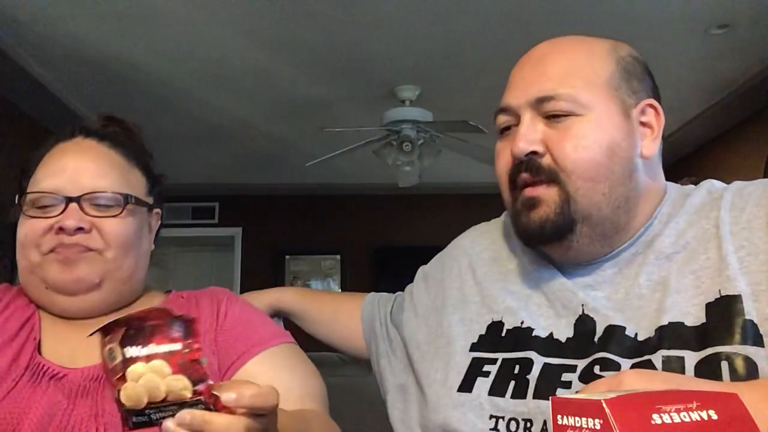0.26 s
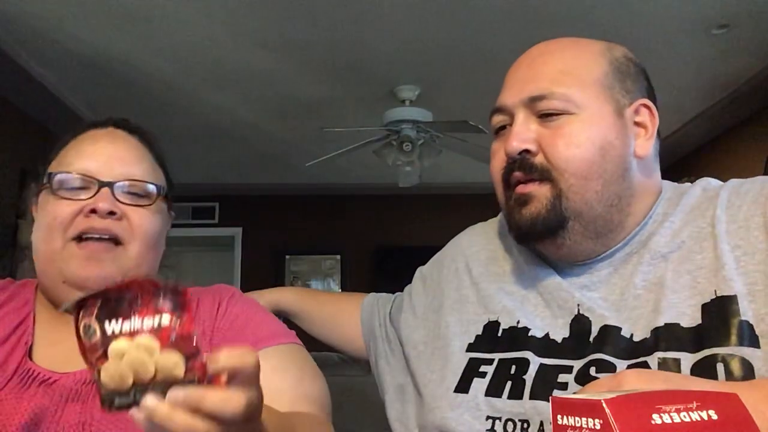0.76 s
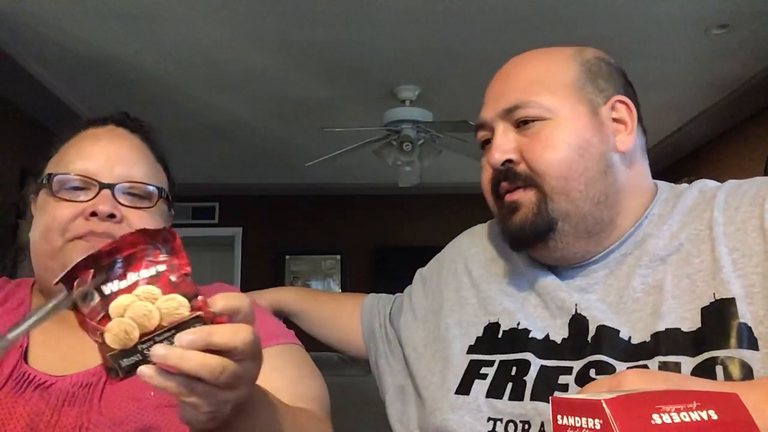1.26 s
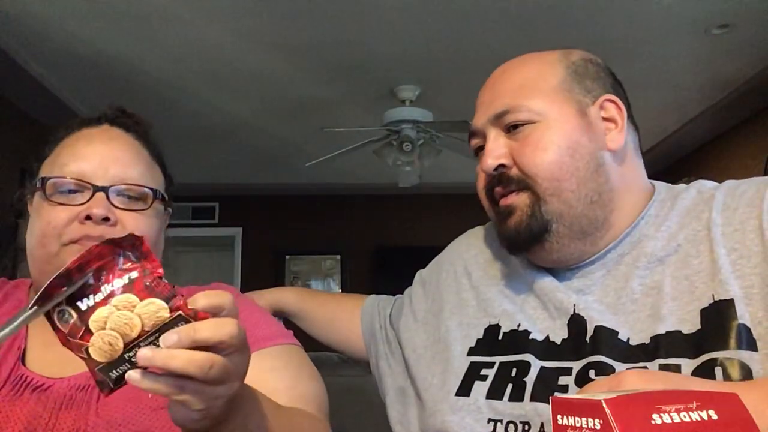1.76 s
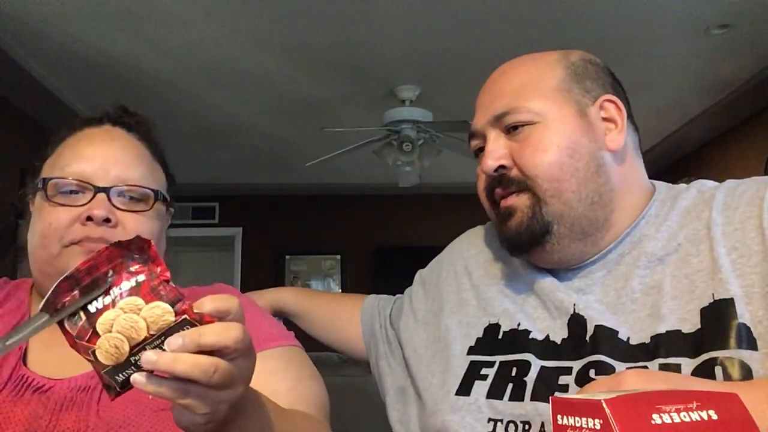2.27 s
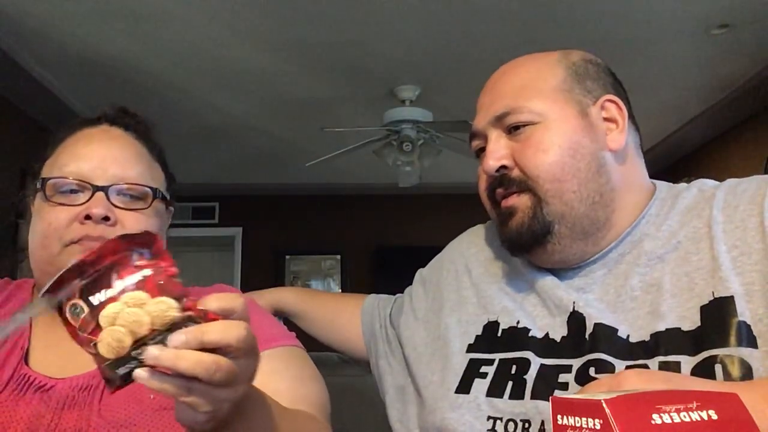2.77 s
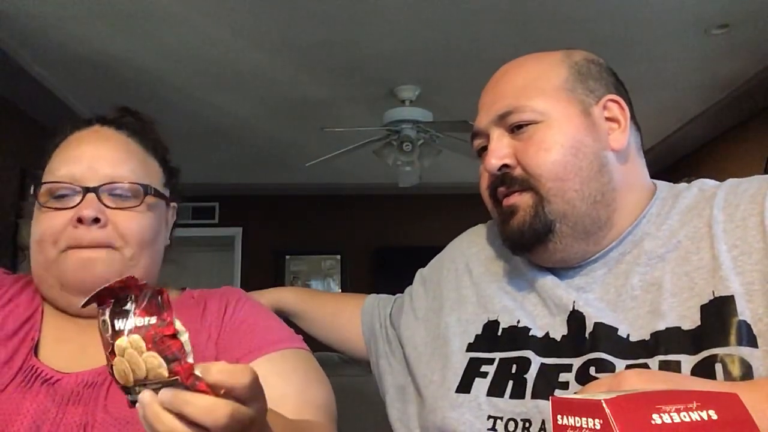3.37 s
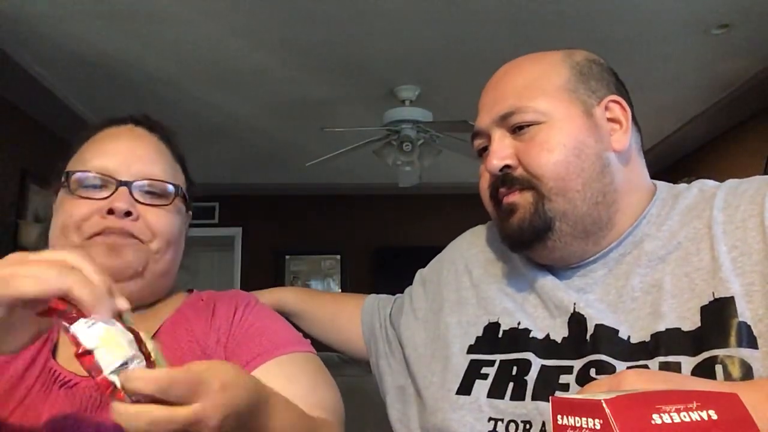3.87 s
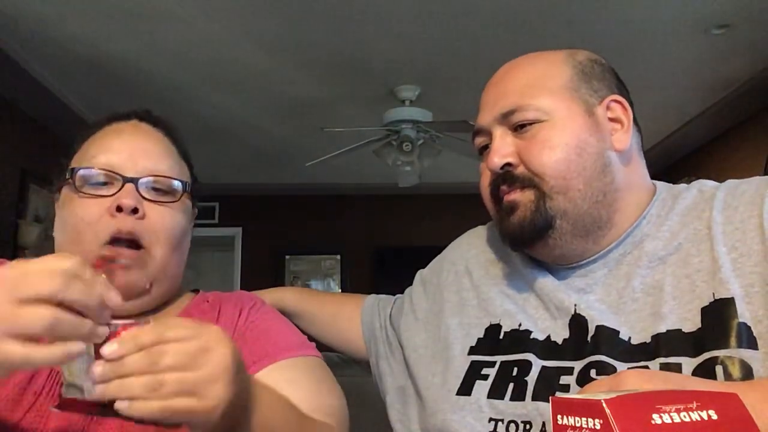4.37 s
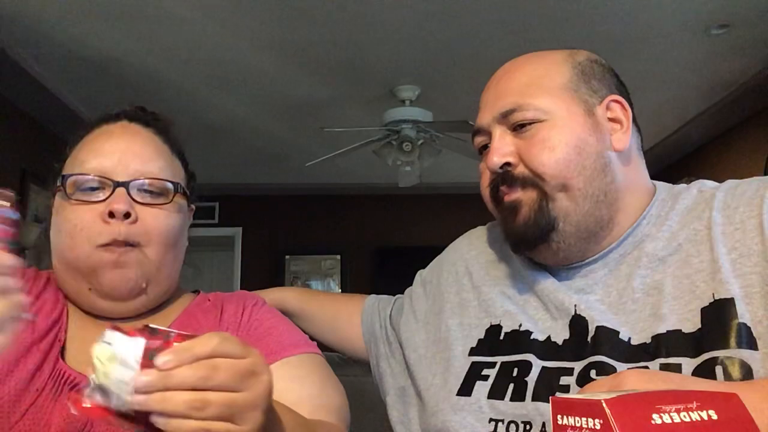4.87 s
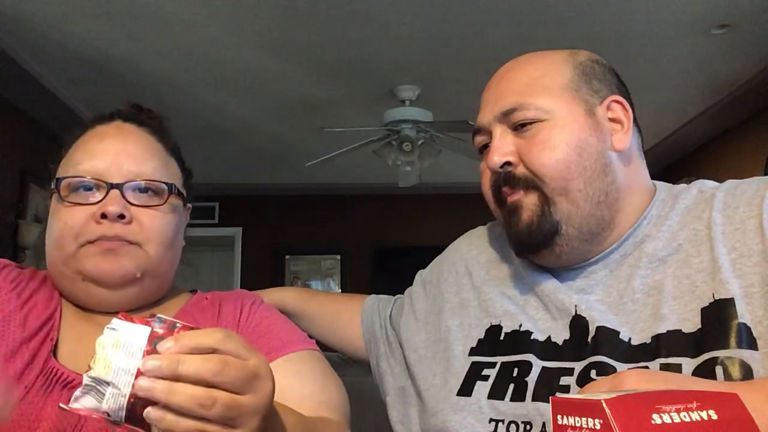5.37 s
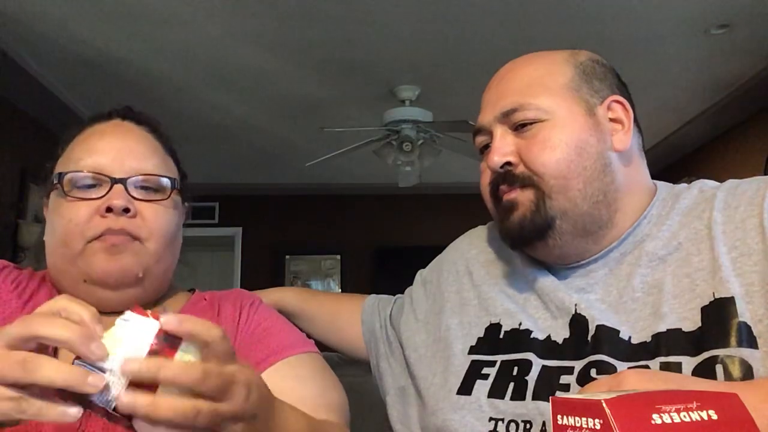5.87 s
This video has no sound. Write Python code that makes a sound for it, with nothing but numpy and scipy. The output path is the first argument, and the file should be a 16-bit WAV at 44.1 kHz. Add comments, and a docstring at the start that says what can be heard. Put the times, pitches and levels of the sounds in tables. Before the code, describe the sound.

Crisp thin foil crinkling, light at first, then a hard clatter on a table and denser tearing crackle, fading to small rustles indoors.

```python
"""A small foil snack bag is turned, cut and torn by hand in a quiet living room, an arm's length from the microphone.
Creases snap as short noise bursts ringing one facet, with foil fizz and a puff of the bag's air, over a crackle
of tiny random snaps. Biscuits bump inside as low resonant scuffs; scissors laid on a wooden table are decaying modes.
Early reflections, a sparse decaying tail and patchy household noise make the room."""
import sys
import numpy as np
from scipy import signal
from scipy.fft import rfft, irfft
from scipy.io import wavfile
from scipy.ndimage import uniform_filter1d

SR = 44100
rng = np.random.default_rng(int(sys.argv[2]) if len(sys.argv) > 2 else 0)


def put_to_file(sound):
    """Save the sound as 16-bit audio at rate SR, in the file named by the first command-line argument."""
    columns = np.atleast_2d(sound).T  # one column per channel
    safe = np.clip(columns, -1, 1)
    whole_steps = np.round(safe * 32767)
    wavfile.write(sys.argv[1], SR, whole_steps.astype(np.int16))


N = 270333

# Treble colour of the foil. Each row: frequency in Hz, relative level in dB.
FOIL_COLOUR = [(3000, -21.5), (5000, 15), (7000, 13), (9500, 10.5), (12500, 6), (14500, -8), (16000, -14)]
# Colour of the whole film sounding. Each row: frequency in Hz, relative level in dB.
FILM_COLOUR = [(120, -23.5), (400, -2), (900, 1.5), (1500, 0), (2600, -0.5), (4000, -4), (6000, -12),
               (10000, -26.5)]


def gain_of(db):
    """Amplitude factor of a level in dB."""
    return 10 ** (np.asarray(db) / 20)


def evened(x):
    """Scale to an RMS of 1."""
    return x / np.sqrt(np.mean(x ** 2) + 1e-20)


def peaked(x):
    """Scale to a peak of 1."""
    return x / (abs(x).max() + 1e-20)


def read(points, hz):
    """Read a curve of (Hz, value) points, interpolated over log frequency."""
    f, value = np.transpose(points)
    return np.interp(np.log(hz + 1), np.log(f + 1), value)


def add(mix, s, sound):
    """Lay a sound into the mix at s seconds, cut at the end."""
    part = mix[round(s * SR):][:len(sound)]
    part += sound[:len(part)]


def coloured(x, spectrum):
    """Causal filter with the given spectrum: the phase follows from the log gain."""
    hz = abs(np.fft.fftfreq(2048, 1 / SR))
    log_gain = np.log(gain_of(read(spectrum, hz)))
    taps = np.fft.ifft(np.exp(np.conj(signal.hilbert(log_gain)))).real[:1024]
    return signal.oaconvolve(x, taps)[:len(x)]


def resonate(x, hz, width_hz):
    """One resonance of gain near 1: a single complex pole."""
    pole = np.exp((2j * hz - width_hz) * np.pi / SR)
    return 2 * signal.lfilter([1 - abs(pole)], [1, -pole], x).real


def resonate_twice(x, hz, width_hz):
    """The same resonance passed twice, for steeper sides."""
    return resonate(resonate(x, hz, width_hz), hz, width_hz)


def room_tone():
    """Low household rumble and hiss: shaped noise whose level is slightly patchy in time and frequency."""
    # Spectrum of the quiet room. Each row: frequency in Hz, relative density in dB per Hz.
    air_spectrum = [(18, -31), (30, -9), (71, 12), (280, 6.5), (937, -35.5), (1960, -10), (2350, -16),
                    (5310, -13), (12000, -52), (14800, -39), (16000, -51)]
    level_db = -68  # RMS
    frames, hz = N // 256 + 5, np.fft.rfftfreq(1024, 1 / SR)
    a, b, patches = rng.standard_normal((frames, 513, 3)).T
    patches = uniform_filter1d(patches, 10, 0)  # over frequency
    patches = evened(uniform_filter1d(patches, 12, 1))  # over time
    patch_db = 2 * patches
    z = (a + 1j * b) * gain_of(read(air_spectrum, hz)[:, None] + patch_db)
    noise = signal.istft(z, nperseg=1024, noverlap=768)[1][:N]
    return gain_of(level_db) * evened(noise)


def room(x):
    """Sparse taps of random sign, each band dying at its own speed; three tails take turns."""
    # Decay of the living room. Each row: frequency in Hz, t60 in s.
    decay = [(125, 0.64), (300, 0.36), (800, 0.17), (2000, 0.26), (5000, 0.27), (12000, 0.3)]
    out = np.zeros(N)
    turn = 2 * np.pi * 3.1 * np.arange(N) / SR  # 3.1 Hz
    for k in range(3):
        taps = np.zeros(SR // 2)
        at = np.arange(330, len(taps) - 20, 20)
        taps[at + rng.integers(0, 20, len(at))] = rng.choice([-1., 1.], len(at))
        hz, t, z = signal.stft(taps, SR, nperseg=256)
        fade_db = -60 * t / read(decay, hz)[:, None]
        tail = signal.istft(z * gain_of(fade_db), SR, nperseg=256)[1]
        share = np.sqrt(2 / 3) * np.cos(turn + k * np.pi / 3)  # the three powers sum to 1
        out += signal.fftconvolve(x * share, tail / np.linalg.norm(tail))[:N]
    return out


def echoes(x):
    """The first few reflections, each a single delayed copy."""
    # Off table, ceiling and walls. Each row: delay in s, level in dB.
    reflections = [(.0045, -41.5), (.0085, -22.5), (0.012, -19.5), (0.017, -21.5), (.021, -47.5)]
    return sum(gain_of(db) * np.pad(x, (round(s * SR), 0))[:N] for s, db in reflections)


def knocks():
    """Each blow rings the table top and rattles on for a moment; steel adds a clack from the upper modes."""
    # Blows on the table. Each row: start in s, peak of the wood in dB, peak of the steel clack in dB re wood,
    # freedom of the top to ring from 0 to 1.
    blows = [(0.153, -31, -8, 0.55), (2.749, -44, 6.5, 0.5), (3.241, -31, 1.5, 0.53),
             (3.343, -32.5, 0, 0.23), (3.378, -23, -3.5, 0.77), (3.481, -20.5, -9.5, 0.84),
             (3.507, -21.5, -7.5, 0.48)]
    # Modes, six of wood then three of clack. Each row: frequency in Hz, relative level in dB,
    # t60 in s when fully free.
    modes = [(71.6, -19, 0.79), (132.8, 3, 0.21), (279.6, 0.5, 0.37), (360, -12, 0.23), (525, -5, 0.048),
             (630, -32, 0.069), (1126, 4.5, 0.16), (1312, 7.5, 0.083), (2570, 5, 0.015)]
    out, t = np.zeros(N), np.arange(SR // 2) / SR
    for (s, db, clack_db, free), noise in zip(blows, rng.standard_normal((len(blows), 3000))):
        freedom = np.clip(free, .2, 1)
        ring = [gain_of(mode_db - 60 * t / (t60 * freedom)) * np.sin(2 * np.pi * hz * t)
                for hz, mode_db, t60 in modes]
        rattle = 0.0077 * noise * np.exp(-t[:len(noise)] / 0.0065)
        rattle[0] += 1  # the blow itself
        wood = sum(ring[:6]) * (1 - np.exp(-t / 0.0019))  # the bass swells slowly
        wood = peaked(signal.oaconvolve(wood, rattle))
        steel = peaked(signal.oaconvolve(sum(ring[6:]), rattle))
        add(out, s, gain_of(db) * (wood + gain_of(clack_db) * steel))
    return out


def bumps():
    """Dull soft blows: a rough scuff that dies away, heard around one low pitch."""
    # Biscuits bump inside the bag. Each row: start in s, peak in dB, pitch in Hz, t60 of the scuff in s.
    biscuits = [(1.159, -42, 240, 0.062), (1.731, -45.5, 550, 0.053), (2.316, -41.5, 390, 0.097),
                (2.425, -36, 525, 0.02), (2.634, -36.5, 378, 0.069), (2.741, -39, 382, 0.14),
                (4.788, -32, 303, 0.036), (5.204, -42, 620, 0.13), (5.221, -44.5, 480, 0.077),
                (5.262, -48, 620, 0.34), (5.701, -45.5, 368.4, 0.032)]
    out, t = np.zeros(N), np.arange(6000) / SR
    for (s, db, hz, t60), noise in zip(biscuits, rng.standard_normal((len(biscuits), len(t)))):
        push = 1.54 * np.exp(-t / 0.0001) + noise * gain_of(-60 * t / max(t60, .01))
        thud = resonate(resonate(push, hz, 0.14 * hz), hz, 0.95 * hz)
        add(out, s, gain_of(db) * peaked(thud))
    return out


def bag_air(x):
    """The hollow low voice of the bag: resonances of its air and panels."""
    # Each row: frequency in Hz, width of each of two passes in Hz, level in dB.
    hollows = [(279.5, 300, 5), (360.5, 253, 7.5), (527, 383, 5.5)]
    return sum(gain_of(db) * resonate_twice(x, hz, width) for hz, width, db in hollows)


def handling():
    """Levels of film, fizz and rub in dB: each squeeze grips, holds and lets go; powers add over the rest level."""
    # The fingers work the bag. Each row: start in s, hold in s, film level in dB, foil fizz in dB re film,
    # low rub in dB re film.
    squeezes = [(0.0, 0.01, -55.5, -3, -3), (0.187, 0.12, -58, -7.5, -2), (0.49, 0.31, -67, -3.5, -3),
                (1.151, 0.0083, -52, -8, -4), (1.22, 0.3, -68.5, -2.5, -1), (1.7, 0.035, -61, -2, 0.5),
                (2.1, 0.068, -63, -6, -0.5), (2.21, 0.14, -57.5, -3, -7), (2.383, 0.036, -57, 2.5, -0.5),
                (2.633, 0.12, -51.5, -3.5, -4), (3.09, 0.16, -70, -0.5, -9),
                (3.225, 0.069, -58.5, -9.5, -1), (3.38, 0.027, -46.5, -18, 6), (3.481, 0.057, -49.5, -7, 4),
                (3.773, 0.058, -52.5, -3.5, -2.5), (3.905, 0.013, -49.5, -0.5, -3.5),
                (4.144, 0.11, -59.5, 5.5, -0.5), (4.41, 0.079, -57.5, -2, -12.5),
                (4.653, 0.14, -47.5, -4.5, -9.5), (4.965, 0.02, -65, -3.5, -10),
                (5.222, 0.037, -59.5, -1, -1), (5.523, 0.02, -65.5, -7, 1), (5.642, 0.28, -60, -10.5, -10),
                (6.08, 0.092, -68, -13, -18)]
    # Film, fizz and rub at rest, in dB.
    rest_db = (-76.5, -81, -75)
    grip_db_per_s, let_go_db_per_s = 514, 179
    t = np.arange(0, N / SR + .01, .002)
    power = gain_of(rest_db)[:, None] ** 2
    for s, hold, db, fizz_db, rub_db in squeezes:
        rise_db = grip_db_per_s * (t - s)
        fall_db = let_go_db_per_s * (s + hold - t)
        shape_db = np.minimum(0, np.minimum(rise_db, fall_db))
        power = power + gain_of(db + shape_db + np.array([[0], [fizz_db], [rub_db]])) ** 2
    return [np.interp(np.arange(N) / SR, t, 10 * np.log10(row)) for row in power]


def ticks(film_db):
    """Stray little creases at random moments, each ringing one facet for a millisecond or so; they follow the film."""
    # Pitches of the facets, in Hz.
    facet_hz = (1770, 2700, 4160, 6500, 9500)
    per_s, least_db, spread_db = 49, 6, 3.1  # the softest tick peaks 6 dB above the film level
    tick_db = film_db + least_db + spread_db * np.minimum(rng.exponential(1, N), 3)
    size = gain_of(tick_db) * (rng.random(N) < per_s / SR)
    facet = rng.integers(0, len(facet_hz), N)
    noise = rng.standard_normal((len(facet_hz), 300))
    burst = noise * np.exp(-np.arange(noise.shape[1]) / (0.0017 * SR))
    out = np.zeros(N)
    for k, hz in enumerate(facet_hz):
        tick = peaked(resonate_twice(burst[k], hz, 0.51 * hz))
        out += signal.oaconvolve(size * (facet == k), tick)[:N]
    return out


def grains(per_s, spread_db, rub):
    """Random tiny snaps, a few of them large, each smeared over some milliseconds, on a smooth rub."""
    size = gain_of(spread_db * np.minimum(rng.exponential(1, N), 3.6)) * (rng.random(N) < per_s / SR)
    smeared = signal.lfilter([1], [1, -np.exp(-1 / (0.0065 * SR))], size)
    return (rub + smeared) * rng.standard_normal(N)


def crackle():
    """Fine creasing under the fingers: film and foil crackle apart, the air of the bag follows the film.
    Light handling is a smooth rub, firm handling breaks up into grains."""
    film_db, fizz_db, rub_db = handling()
    firm = np.clip((np.maximum(film_db, fizz_db) + 73.5) / 16, 0, 1)
    film_grains = evened(grains(per_s=220, spread_db=6.5, rub=0.96))
    film = firm * film_grains + (1 - firm) * rng.standard_normal(N)
    foil_grains = evened(grains(per_s=260, spread_db=4.5, rub=0.3))
    foil = firm * foil_grains + (1 - firm) * rng.standard_normal(N)
    film_sound = gain_of(film_db) * evened(coloured(film, FILM_COLOUR))
    low_rub = gain_of(rub_db) * evened(bag_air(film))
    fizz = gain_of(fizz_db) * evened(coloured(foil + 0.55 * film, FOIL_COLOUR))
    return film_sound + low_rub + fizz + ticks(film_db)


def snaps():
    """A crease flips in a millisecond or two: its facet rings briefly, the foil fizzes, the bag puffs.
    Gives what reaches the microphone directly and what is thrown toward the walls."""
    # Creases that snap. Each row: start in s, peak of the facet and film in dB, pitch of the facet in Hz,
    # treble fizz in dB re that peak, puff of the bag in dB re that peak.
    creases = [(0.102,-46.5,1570,-13,-4),(.116,-36.5,3370,-20,-30),(0.155,-22.5,1400,-10,-0.5),(.162,-30.5,1470,2,-18),(0.224,-29.5,3450,4,-22),(0.266,-43,2700,-13,-15),(.314,-48,1420,-15,-6),(.415,-33,3210,4,-21),(.474,-36,2720,-4,-34),(.53,-26.5,2600,1.5,-25),(0.637,-44,5060,-30,-28),(0.719,-55,1600,5,-20),(1.074,-54,3800,5.5,-27),(1.11,-37,5070,-13,-29),(1.154,-18.5,5000,-7,-18),(1.16,-28,1040,4.5,0),(1.465,-41,4590,-6,-31),(1.481,-24.5,4600,-21,-21),(1.609,-35.5,2310,-2,-32),(1.698,-22.5,2230,0.5,-28),(1.741,-38,1940,-12,-8),(1.891,-46,1735,-35,-1),(1.972,-55,2000,3,-25),
               (2.075,-50.5,4930,7,-13),(2.089,-32,2220,-41,-19),(2.113,-39.5,1053,-19,-27),(2.127,-29,4400,-9,-19),(2.161,-16,4770,-6,-40),(2.211,-23.5,2100,-1,-13),(2.228,-25.5,6460,-2,-35),(2.251,-19,7500,-25,-26),(2.27,-18.5,5940,-42,-24),(2.312,-39,6380,9,-40),(2.346,-24.5,5640,-7,-17),(2.424,-33.5,740,3,-4.5),(2.431,-21.5,4570,-8.5,-11.5),(2.506,-29.5,1590,1,-47),(2.567,-24.5,5530,-3,-23),(2.601,-28.5,4800,-32,-10),(2.634,-34.5,1250,4,-22),(2.68,-33,5400,7,-6),(2.709,-29.5,5870,3,-11),(2.733,-23.5,8850,-31,-10),(2.76,-23.5,6400,-35,-45),
               (3.074,-55,2810,-2,-10),(3.202,-46,2654,-7,-24),(3.38,-14,1530,-38,-0.5),(3.466,-35,1418,-13,-15),(3.483,-10.5,2250,-52,-9.5),(3.527,-29,2380,-33,1.5),(3.585,-49,2190,12.5,-6),(3.731,-44,3810,-3,-22),(3.772,-40,1005,0,-3),(3.778,-41.5,1974,-1,0),(3.808,-23,5100,-12,-48),(3.833,-28.5,3020,-22,-37),(3.902,-32,1970,-17,-29),(3.916,-20,1710,-4,-20),(3.942,-40,2850,-16,-21),(3.994,-33.5,6360,-21,-29),
               (4.02,-29.5,1540,-0.5,-14),(4.052,-24,1576,-31,-36),(4.092,-31.5,2520,-3,-18),(4.144,-28,2900,5.5,-42),(4.148,-20,2490,-5,-31),(4.186,-25,2900,-2,-24),(4.193,-15.5,2570,-6,-50),(4.213,-33,2670,6,-41),(4.231,-23.5,2520,3.5,-31),(4.268,-35.5,2800,-19,-35),(4.296,-37.5,2560,1,-43),(4.353,-37,1897,-7,-41),(4.401,-25.5,3300,0.5,-47),(4.461,-35.5,4740,-17,-42),(4.472,-35.5,2560,0,-36),(4.528,-43,6710,12,-36),(4.556,-29,2400,-26,-13.5),(4.646,-27.5,2730,-7,-40),(4.664,-17.5,8700,-23,-33),(4.678,-23,1320,-4,-32),(4.688,-25,6800,-15,-14.5),(4.693,-20.5,2550,1.5,-31),(4.704,-17.5,5190,4,-38),(4.713,-22.5,2800,-6,-16),(4.728,-21,1010,-12,-18),(4.742,-24.5,2440,3.5,-31),(4.759,-22.5,2570,-9,-31),(4.789,-19.5,3100,3,-7),
               (4.99,-47,6620,-12,-12),(5.001,-43,7850,-11,-24),(5.044,-48,3700,-32,-27),(5.132,-41,1340,-54,-12),(5.172,-32,2700,-31,-50),(5.222,-37,802,-5,3.5),(5.233,-32,2280,0,-25),(5.339,-27.5,1900,-0.5,-17),(5.51,-51.5,1050,-28,-20),(5.576,-51,2520,-11,-16),(5.634,-34,3330,-24,-18),(5.652,-42,2500,2,-34),(5.677,-33,2540,-30,-10.5),(5.722,-42,1070,1.5,-17),(5.733,-40.5,2130,-12,-2),(5.763,-29,5800,-31,-34),(5.769,-25,1970,-30,-25),(5.778,-32.5,970,5.5,-6.5),(5.849,-33.5,1940,2.5,-46),(5.888,-36.5,1920,-5,-31),(5.915,-30.5,1820,-2.5,-9.5),(6.017,-45.5,2980,-21,-26),(6.082,-40.5,1910,-34,-17)]
    broad_db, broad_per_fizz = -5.5, 0.16  # the whole film sounds along, more so in fizzy snaps
    walls_db, walls_per_octave_db = 2, 0.6  # share thrown to the walls at 2500 Hz, its change with pitch
    direct, thrown, t = np.zeros(N), np.zeros(N), np.arange(1600) / SR
    for (s, db, hz, fizz_db, puff_db), noise in zip(creases, rng.standard_normal((len(creases), len(t)))):
        decay = np.exp(-t / 0.00074) + 0.093 * np.exp(-t / 0.0095)
        z = rfft(noise * (1 - np.exp(-t / 0.0003)) * decay)
        flip = irfft(z / abs(z) ** 0.028)  # spectrum slightly evened out
        flip = flip * (1 - np.exp(-t / 0.00051)) * np.exp(-t / 0.024)
        broad = gain_of(broad_db + broad_per_fizz * fizz_db) * coloured(flip, FILM_COLOUR)
        facet = resonate_twice(flip, hz, 0.68 * hz) + broad
        fizz = gain_of(fizz_db) * peaked(coloured(flip, FOIL_COLOUR))
        puff = gain_of(puff_db) * peaked(bag_air(flip))
        snap = gain_of(db) * (peaked(facet) + fizz + puff)
        add(direct, s, snap)
        add(thrown, s, gain_of(walls_db + walls_per_octave_db * np.log2(hz / 2500)) * snap)
    return direct, thrown


def scene():
    """The bag and table heard close, their reflections and tail, and the quiet room."""
    direct, thrown = snaps()
    rest = bumps() + knocks() + crackle()
    to_walls = thrown + rest
    close = direct + rest
    tail = gain_of(-12.5) * room(to_walls)
    return (close + echoes(to_walls) + tail + room_tone())[None]


def record(dry):
    """A small microphone that drops the deep bass; then the band limit of the recorder."""
    thin = signal.sosfilt(signal.butter(4, 48, "highpass", fs=SR, output="sos"), dry)
    band_limit = signal.firwin(255, 15900, window=("kaiser", 9), fs=SR)  # edge in Hz
    return signal.oaconvolve(thin, band_limit[None], "same")


dry = scene()
out = record(dry)
put_to_file(out)
```